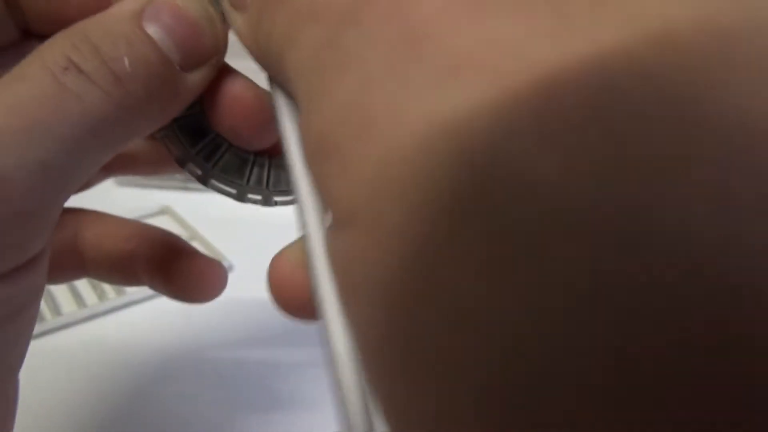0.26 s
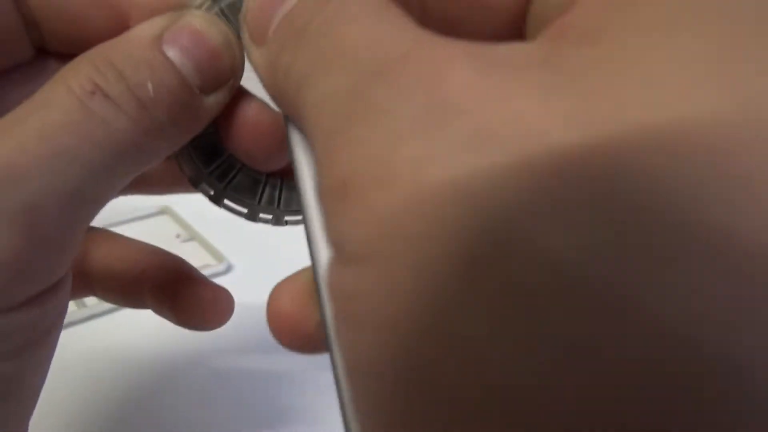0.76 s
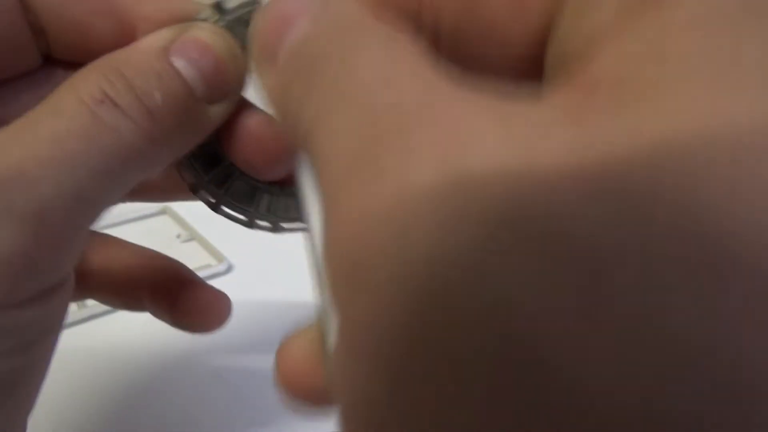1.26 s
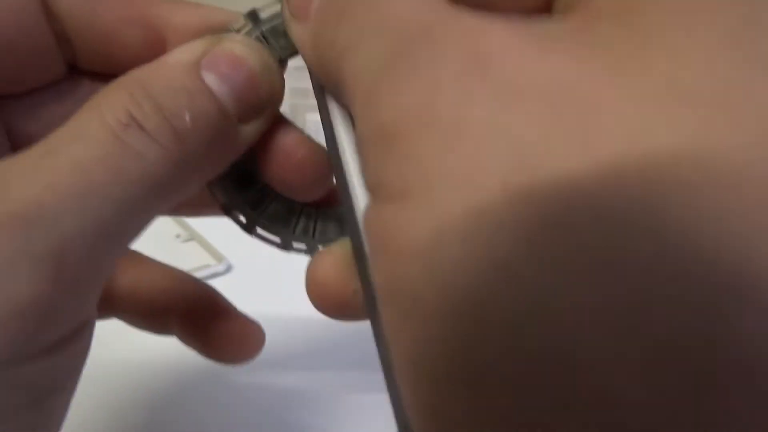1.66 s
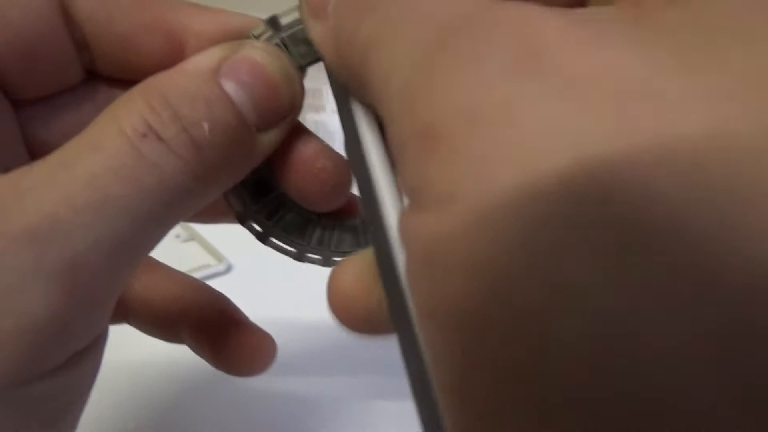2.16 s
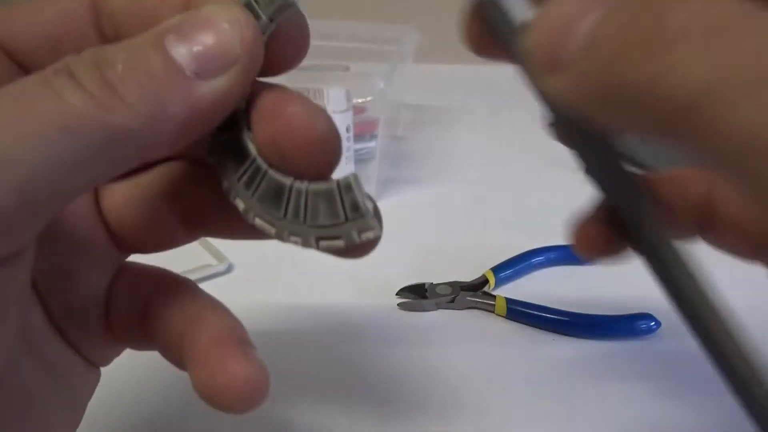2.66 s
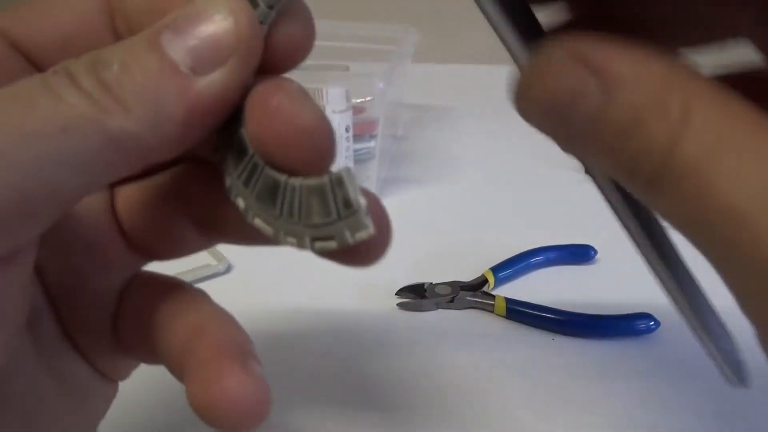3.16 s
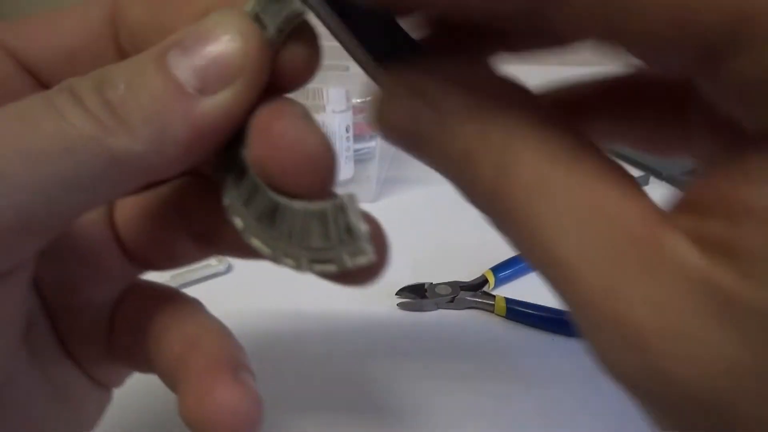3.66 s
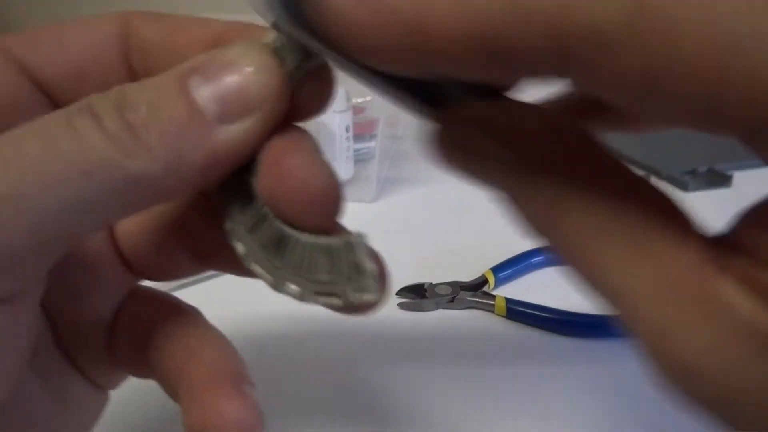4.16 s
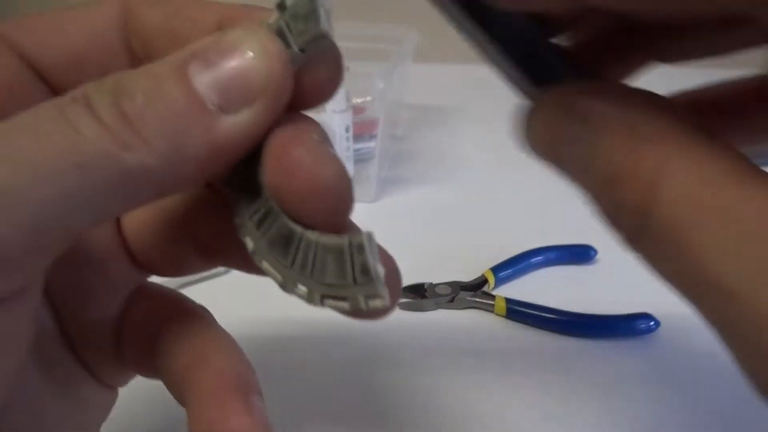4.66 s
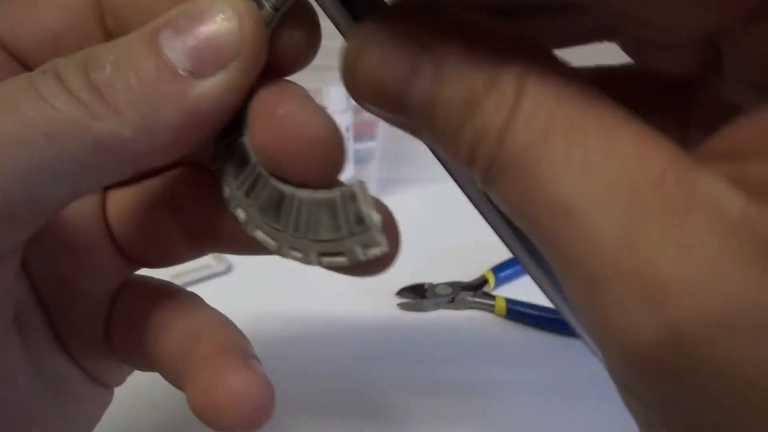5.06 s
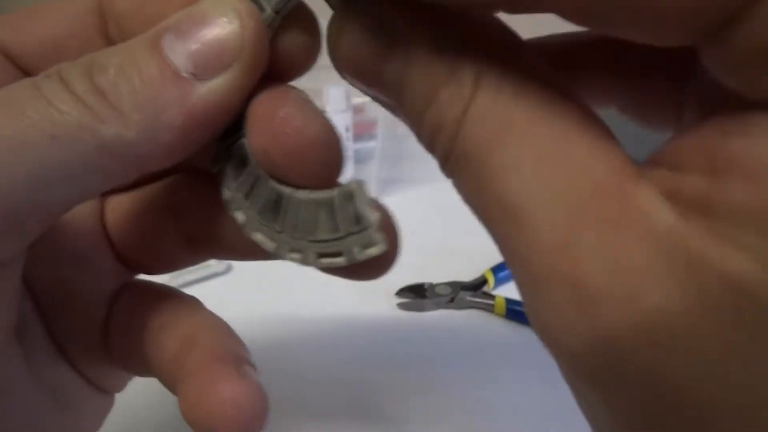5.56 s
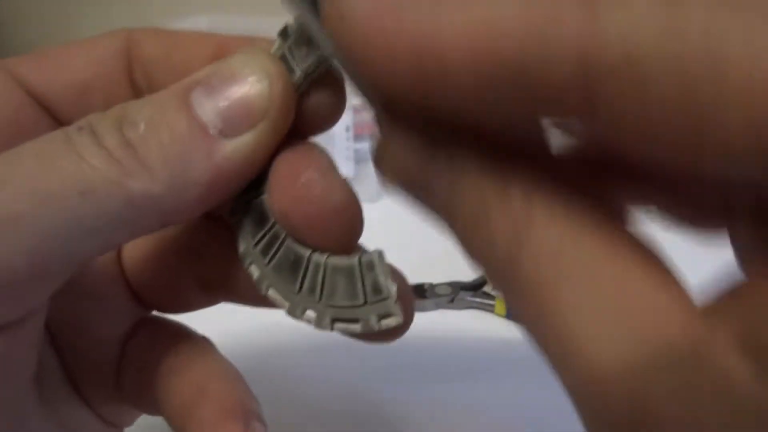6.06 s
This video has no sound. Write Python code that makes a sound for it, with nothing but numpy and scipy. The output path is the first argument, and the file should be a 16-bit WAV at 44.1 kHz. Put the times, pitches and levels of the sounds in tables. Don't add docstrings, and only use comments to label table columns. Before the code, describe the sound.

A sanding stick rasps rhythmically on a small plastic part, then six separate flicks tap and snap, then quick light polishing strokes, close in a quiet room.

```python
import sys
import numpy as np
from scipy import signal
from scipy.fft import rfft, irfft
from scipy.io import wavfile
from scipy.ndimage import uniform_filter1d

SR = 44100
rng = np.random.default_rng(int(sys.argv[2]) if len(sys.argv) > 2 else 0)


def store_wav(level_fs):
    pcm = np.round(np.clip(np.atleast_2d(level_fs), -1, 1) * 32767)
    wavfile.write(sys.argv[1], SR, pcm.T.astype(np.int16))


def gain_from_db(level_db):
    decades = np.asarray(level_db, float) / 20
    return 10 ** decades


N = 277830
GRID_HZ = np.linspace(0, SR / 2, 1025)


def tone_db(points, hz):
    f, db = np.transpose(points)
    return np.interp(np.log(np.maximum(hz, 1)), np.log(f), db)


def ring(db):
    cepstrum = irfft(db * np.log(10) / 20)
    half = len(cepstrum) // 2
    folded = np.concatenate([cepstrum[:1], 2 * cepstrum[1:half], cepstrum[half:half + 1], np.zeros(half - 1)])
    return irfft(np.exp(rfft(folded)))[:half]


def colour(x, points):
    return signal.fftconvolve(x, ring(tone_db(points, GRID_HZ)))[:len(x)]


def unit(x):
    return x / np.sqrt(np.mean(x ** 2))


def walk(rate, size):
    k = int(SR / rate)
    held = np.repeat(rng.standard_normal(size // k + 1), k)
    return 0.8 * uniform_filter1d(held, k)[:size]


def band(hz, width_hz):
    f = np.fft.rfftfreq(N, 1 / SR)
    noise = rfft(rng.standard_normal(N))
    return unit(irfft(noise / (1 + (2 * (f - hz) / width_hz) ** 2), N))


def add(track, s, sound):
    i = int(s * SR)
    track[i:i + len(sound)] += sound[:len(track) - i]


# frequency in Hz, level in dB per Hz.
HUM_AND_HISS = [(18, -41.5), (30, -15), (70, -10.5), (103, -1.5), (131, -17.5), (252, -13), (319, -23),
                (426, -12), (499, -18.5), (1190, -17.5), (2350, -24.5), (12000, -30), (16000, -29)]
# frequency in Hz, side level in dB.
HUM_AND_HISS_WIDTH = [(60, -15.5), (300, -2.5), (700, -8), (1400, -5), (3100, -7.5), (7000, 2),
                      (16000, -10.5)]


def hum_and_hiss():
    f = np.fft.rfftfreq(N, 1 / SR)
    gain = gain_from_db(tone_db(HUM_AND_HISS, f))
    mid, side = (rfft(noise) * gain for noise in rng.standard_normal((2, N)))
    mid = irfft(mid, N)
    side = irfft(side * gain_from_db(tone_db(HUM_AND_HISS_WIDTH, f)), N)
    scale = gain_from_db(-61.5) / np.sqrt(np.mean(mid ** 2))
    return mid * scale, side * scale


# centre in Hz, width in Hz, level in dB.
FAN_BANDS = [
    (1150, 150, -71.5),
    (1470, 160, -69.5),
]


def fan():
    return sum(gain_from_db(db + 2.2 * walk(4.2, N)) * band(hz, width) for hz, width, db in FAN_BANDS)


# time in seconds, level in dB.
OPENING_RUSTLE = [
    (0, -64),
    (.12, -66),
    (.3, -80),
]


def hand_rustle():
    s, db = np.transpose(OPENING_RUSTLE)
    level_db = np.interp(np.arange(N) / SR, s, db, right=-120)
    return gain_from_db(level_db) * (band(2700, 1600) + band(460, 450))


JOLT_DB = [
    -41.5,
    -34,
    -33.5,
]


def bench_rumble():
    rest_db, lag_s, width_s = -77, 0.012, 0.072
    t = np.arange(N) / SR
    shake = np.full(N, gain_from_db(rest_db))
    for table, jolt_db in zip((RUBS, FLICKS, POLISHES), JOLT_DB):
        for _, _, stop, _, top_db in table:
            shake += gain_from_db(top_db + jolt_db) * np.exp(-((t - stop - lag_s) / width_s) ** 2)
    return shake * (band(48, 26) + gain_from_db(-6) * band(104, 60))


# time in seconds, level in dB.
SLEEVES = [(0, -59.5), (.3, -72), (.56, -58), (2.2, -60.5), (2.8, -75), (2.9, -84), (3.35, -70), (3.5, -63),
           (3.85, -61), (4.1, -67), (4.9, -73), (5.5, -69.5), (6.3, -66.5)]


def sleeves():
    s, rub_db = np.transpose(SLEEVES)
    level_db = np.interp(np.arange(N) / SR, s, rub_db) - 4.5
    return gain_from_db(level_db + 2.8 * walk(12, N)) * band(214, 238)


# middle in seconds, length in seconds, level in dB, pitch in Hz.
CREAKS = [
    (3.525, 0.08, -62, 492),
    (3.84, 0.082, -66, 444),
    (4.39, .05, -71, 600),
]


def finger_creaks():
    t = np.arange(N) / SR
    return sum(gain_from_db(db) * np.exp(-((t - s) / length) ** 4) * band(hz, 60) for s, length, db, hz in CREAKS)


def background():
    hush, side = hum_and_hiss()
    air = fan() + hand_rustle()
    hush = hush * gain_from_db(0.85 * walk(0.85, N))
    hands = finger_creaks() + sleeves() + bench_rumble()
    return hush + air + hands, side


# frequency in Hz, gain in dB.
ROOM_TONE = [(150, -8), (500, 1.5), (1300, -5), (2500, 0), (5000, -2.5), (7400, -6.5), (9400, -2),
             (12000, -4), (16000, -7)]
# frequency in Hz, side level in dB.
WIDTH = [(60, -22), (200, -2), (700, -15.5), (1300, -22.5), (3000, -13.5), (5500, -19), (8000, -13),
         (11000, -16.5)]


def room(x):
    t60_s, tail_db, bench_s, bench_db = 0.32, -10.5, 0.0041, -27.5
    t = np.arange(int(0.5 * SR)) / SR
    tails = rng.standard_normal((2, len(t))) * 1000 ** (-t / t60_s) * np.clip(t / 0.0017, 0, 1)
    dull = signal.sosfilt(signal.butter(1, 8000, fs=SR, output="sos"), tails)
    tails = dull + (tails - dull) * 1000 ** (-t / 0.36)
    tails *= gain_from_db(tail_db) / np.sqrt(np.sum(tails[0] ** 2))
    tails[0, int(bench_s * SR)] += gain_from_db(bench_db)
    mid, side = signal.fftconvolve(colour(x, ROOM_TONE)[None], tails, axes=1)[:, :N]
    return mid, colour(side, WIDTH) * gain_from_db(2.0)


def scatter(near):
    echoes = rng.standard_normal(400) * np.hanning(400)
    echoes = signal.sosfilt(signal.butter(1, 600, "high", fs=SR, output="sos"), echoes)
    echoes /= np.sqrt(np.sum(echoes ** 2))
    return colour(signal.fftconvolve(near, echoes)[:N], WIDTH)


BODY_HZ = 2400


def grip(points, body_db):
    shift = 1 + 0.0071 * rng.standard_normal()
    ripple_db = uniform_filter1d(rng.standard_normal(len(GRID_HZ)), size=24) * 5.0
    db = tone_db(points, GRID_HZ * shift) + ripple_db + body_db / (1 + (GRID_HZ / BODY_HZ) ** 6)
    treble = (GRID_HZ > 3000) & (GRID_HZ < 15000)
    return ring(db) / np.sqrt(np.sum(gain_from_db(2 * db[treble])) / len(db))


# time in seconds, thud in dB, tick in dB, ring in Hz.
TAPS = [
    (2.9873, -36, -24, 650),
    (3.3597, -20, -22, 606),
    (3.6546, -20, -22, 527),
    (3.9281, -15, -16.5, 670),
    (4.1812, -14, -19.5, 687),
    (4.4576, -18, -14, 623),
    (4.9728, -27.5, -40, 644),
]
# multiple of the ring frequency, level in dB, time to fall 60 dB in seconds.
TAP_MODES = [
    (2.3, 3, 0.0037),
    (1.0, -1, 0.01),
    (.4, 1.5, 0.0043),
]


def taps():
    out, t = np.zeros(N), np.arange(2000) / SR
    for s, thud_db, tick_db, hz in TAPS:
        modes = sum(gain_from_db(db) * np.sin(2 * np.pi * k * hz * t) * 1000 ** (-t / t60) for k, db, t60 in TAP_MODES)
        rattle = uniform_filter1d(rng.standard_normal(len(t)), size=12) * 1000 ** (-t / 0.035)
        add(out, s + 0.00013, gain_from_db(thud_db - 6.0) * (modes + gain_from_db(-5) * rattle))
        push = np.hanning(int(0.00024 * SR))
        add(out, s - 0.00015, -gain_from_db(thud_db) * push)
        tick = grip(FLICK_TONE, 0)
        add(out, s - 0.0001, -gain_from_db(tick_db - 2.5) * tick / np.max(np.abs(tick)))
    return signal.sosfilt(signal.butter(2, 170, "high", fs=SR, output="sos"), out)


def clicks(events, body_db, crumble_share, decay_s):
    out, t = np.zeros(N), np.arange(240) / SR
    for s, peak_db in events:
        points = RUB_TONE if s < 2.9 else FLICK_TONE if s < 4.8 else POLISH_TONE
        crumble = crumble_share * rng.standard_normal(len(t)) * np.exp(-t / decay_s)
        crumble[0] = rng.choice([-1, 1])
        h = signal.fftconvolve(grip(points, 0.78 * (body_db + 19.0)), crumble)
        add(out, s - 0.0001, gain_from_db(peak_db + 3.0) * h / np.max(np.abs(h)))
    return out


def bites():
    events = [(start + 0.002, top_db + catch_db + 1) for start, _, _, catch_db, top_db in [*RUBS, *POLISHES]]
    return clicks(events, body_db=-7, crumble_share=0.54, decay_s=0.00074)


# time in seconds, peak in dB.
DIGS = [(0.4453, -22.5), (0.598, -22), (0.6052, -29), (0.631, -26), (0.6387, -29), (0.662, -25),
        (0.6724, -29), (0.7001, -25), (0.7209, -29), (0.7674, -34.5), (0.7914, -29), (0.7996, -34),
        (0.9933, -28.5), (1.2539, -19.5), (1.3646, -15), (1.5056, -22), (1.62, -22.5), (2.0066, -21),
        (2.0166, -19), (2.1291, -21), (2.2542, -18.5), (3.0009, -26), (3.6885, -16), (3.961, -21),
        (3.9712, -16), (4.4614, -38), (5.298, -31)]


def digs():
    return clicks(DIGS, body_db=-10.5, crumble_share=0.71, decay_s=0.00087)


# time in seconds, peak in dB.
SKIPS = [(0.1952, -19), (0.3504, -21), (0.5217, -20), (0.585, -29), (0.6181, -35), (0.7262, -27),
         (0.7424, -31), (0.8132, -38), (0.8826, -21), (0.979, -46), (1.2227, -38), (1.4073, -7),
         (1.953, -25), (2.2344, -28), (2.3422, -15), (3.0191, -28), (3.3663, -32), (3.535, -46),
         (4.122, -48), (4.213, -19), (4.5193, -17.5), (4.6336, -40), (4.9457, -41), (4.9495, -45),
         (4.9566, -50), (5.2896, -47), (5.8936, -16)]


def skips():
    return clicks(SKIPS, body_db=-22.5, crumble_share=0.42, decay_s=0.00047)


# time in seconds, peak in dB.
SNAPS = [
    (3.0843, -8),
    (3.4431, 2),
    (3.7388, -1),
    (4.0111, 4.5),
    (4.2504, 0.5),
    (4.5142, 3),
]


def snaps():
    return clicks(SNAPS, body_db=-23.5, crumble_share=0.086, decay_s=0.00024)


def grit(size, coarse_db, chatter_db):
    hardness = np.minimum(rng.exponential(size=size), 4.3)
    grains = rng.standard_normal(size) * gain_from_db(coarse_db * hardness)
    chatter = walk(300, size) + 0.53 * walk(44.7, size)
    return unit(grains * gain_from_db(chatter_db * chatter))


# strongest moment in seconds,
# level in dB, rise and fall in seconds.
GRAZES = [(0.212, -58.5, .003, 0.032), (0.264, -60, .06, .012), (0.425, -51, 0.033, .02),
          (0.602, -53, 0.0264, .016), (0.663, -35.5, 0.036, 0.022), (0.65, -42, 0.035, 0.042),
          (0.697, -39.5, 0.022, 0.024), (0.72, -42, 0.025, 0.013), (0.741, -57, .003, 0.0068),
          (0.792, -50.5, 0.0086, 0.024), (0.78, -55, 0.023, .01), (2.498, -69, .05, .02),
          (2.656, -61, .3, 0.12), (3.968, -27.5, 0.0064, .001), (4.218, -23, 0.0035, .001),
          (4.43, -56, .02, .01), (4.95, -67, .05, .01), (5.0, -53.5, 0.032, 0.045)]


def grazing():
    t, force = np.arange(N) / SR, np.zeros(N)
    for s, db, rise_s, fall_s in GRAZES:
        away = np.where(t < s, (s - t) / rise_s, (t - s) / fall_s)
        force += gain_from_db(db - 15 * away)
    skim = signal.fftconvolve(force * grit(N, 2.5, 3.9), grip(RUB_TONE, 3.4))[:N]
    return skim + gain_from_db(-13.5) * force * band(220, 240)


def strokes(table, points, usual_top_db, usual_body_db, bite_s, hold, linger_s, coarse_db, chatter_db):
    out = np.zeros(N)
    for start, top, stop, catch_db, top_db in table:
        t = start + np.arange(int((stop - start + linger_s) * SR)) / SR
        brake = top + hold * (stop - top)
        rise = np.sin(np.pi / 2 * np.clip((t - start) / (top - start), 0, 1))
        slow = np.cos(np.pi / 2 * np.clip((t - brake) / (stop + linger_s - brake), 0, 1)) ** 1.4
        bite = np.clip((t - start) / bite_s, 0, 1)
        rubbing = gain_from_db(top_db) * slow * bite * grit(len(t), coarse_db, chatter_db)
        body_gain_db = min(0.95 * (usual_top_db - top_db), 4.5)
        whole = grip(points, usual_body_db + body_gain_db)
        body = signal.sosfilt(signal.butter(2, BODY_HZ, fs=SR, output="sos"), whole)
        pressure = gain_from_db(0.28 * catch_db * (1.5 - rise) - 2.0)
        speed = gain_from_db(1.45 * catch_db * (1 - rise))
        add(out, start, signal.fftconvolve(rubbing * pressure, body))
        add(out, start, signal.fftconvolve(rubbing * speed, whole - body))
    return out


# catch, fastest moment and stop in seconds, catch in dB under the top, top in dB.
POLISHES = [(5.02, 5.064, 5.075, -8, -43.5), (5.146, 5.166, 5.214, -4, -33),
            (5.295, 5.318, 5.366, -3, -30.5), (5.401, 5.435, 5.493, -5, -33.5),
            (5.516, 5.548, 5.603, -6, -32.5), (5.641, 5.688, 5.733, -10, -30), (5.764, 5.8, 5.846, -4, -32),
            (5.881, 5.92, 5.971, -4, -36), (6.002, 6.036, 6.08, -5, -33.5),
            (6.117, 6.155, 6.207, -2.5, -36), (6.228, 6.275, 6.32, -8, -33)]
# frequency in Hz, level in dB per Hz.
POLISH_TONE = [(88, -53), (150, -20.5), (264, -24.5), (422, -17.5), (854, -13), (1120, -7.5), (2060, -14),
               (2450, -10), (5450, -9.5), (5950, -7.5), (7400, 0), (9000, -9), (11000, -3), (14800, -9.5),
               (16000, -23)]


def polishing():
    return strokes(POLISHES, POLISH_TONE, usual_top_db=-29.5, usual_body_db=-0.1, bite_s=0.0033,
                   hold=0.29, linger_s=0.0096, coarse_db=2.0, chatter_db=2.5)


# catch, fastest moment and stop in seconds, catch in dB under the top, top in dB.
FLICKS = [
    (3.0, 3.04, 3.085, -16, -25.5),
    (3.388, 3.44, 3.444, -14, -23),
    (3.685, 3.736, 3.74, -4.5, -24),
    (3.966, 4.0, 4.012, -3, -23),
    (4.216, 4.245, 4.252, -4, -22),
    (4.476, 4.51, 4.516, -5, -22),
]
# frequency in Hz, level in dB per Hz.
FLICK_TONE = [(88, -59), (150, -23), (231, -18), (871, -16.5), (1140, -8.5), (2360, -13), (3040, -14.5),
              (3840, -8.5), (4950, -9), (7470, 0), (9440, -6.5), (12200, -2), (16000, -17)]


def flicking():
    return strokes(FLICKS, FLICK_TONE, usual_top_db=-21.5, usual_body_db=1.3, bite_s=0.0011,
                   hold=0.94, linger_s=0.0018, coarse_db=3.0, chatter_db=-0.7)


# catch, fastest moment and stop in seconds, catch in dB under the top, top in dB.
RUBS = [(0.142, 0.189, 0.22, -23, -36), (0.325, 0.368, 0.411, -9.5, -34), (0.441, 0.503, 0.549, -5, -29),
        (0.858, 0.906, 0.942, -15.5, -29.5), (1.0, 1.058, 1.086, -4, -30.5),
        (1.12, 1.164, 1.204, -8.5, -27), (1.236, 1.292, 1.336, -5, -29), (1.363, 1.422, 1.458, -4, -27.5),
        (1.488, 1.551, 1.592, -7.5, -30), (1.613, 1.661, 1.7, -5, -26), (1.739, 1.805, 1.843, -5, -29.5),
        (1.871, 1.916, 1.958, -7, -26.5), (1.995, 2.046, 2.094, -7.5, -30.5),
        (2.122, 2.176, 2.205, -6, -26.5), (2.249, 2.301, 2.354, -5, -25.5)]
# frequency in Hz, level in dB per Hz.
RUB_TONE = [(88, -47), (150, -13), (231, -12), (368, -21), (566, -10.5), (941, -17.5), (1100, -10),
            (1720, -3.5), (2310, -11), (3770, -7.5), (4950, -3), (5910, -4.5), (11300, -2), (15100, -8),
            (16000, -13)]


def rubs():
    return strokes(RUBS, RUB_TONE, usual_top_db=-26.5, usual_body_db=0.5, bite_s=0.0026,
                   hold=0.046, linger_s=0.0078, coarse_db=2.0, chatter_db=1.3)


def scene():
    near = rubs() + flicking() + polishing() + grazing()
    near += bites() + digs() + skips() + snaps() + taps()
    scattered = scatter(near)
    room_mid, room_side = room(near)
    quiet_mid, quiet_side = background()
    mid = near + room_mid + quiet_mid
    side = scattered + room_side + quiet_side
    left_db = 0.9
    return np.array([(mid + side) * gain_from_db(left_db / 2), (mid - side) * gain_from_db(-left_db / 2)])


# from this frequency in Hz, share of the time.
SIDE_KEPT = [(0, 1), (1200, .6), (1900, .35), (2600, .2), (3400, .15), (4100, .3), (4800, .7), (5600, .9),
             (6900, .85), (8200, .8), (9600, .9), (11300, .05), (12500, .04)]


def thin_side(x):
    mid, side = (x[0] + x[1]) / 2, (x[0] - x[1]) / 2
    f, _, frames = signal.stft(side, SR, nperseg=2048)
    edges, share = np.transpose(SIDE_KEPT)
    kept = rng.random((len(edges), frames.shape[1] // 2 + 1)) < share[:, None]
    kept = np.repeat(kept, 2, axis=1)[:, :frames.shape[1]]
    band_of = np.searchsorted(edges, f, side="right") - 1
    side = signal.istft(frames * kept[band_of], SR, nperseg=2048)[1][:N]
    return np.array([mid + side, mid - side])


def band_limit(x):
    return signal.sosfilt(signal.butter(12, 17000, fs=SR, output="sos"), x)


def record(dry):
    rounded = 0.8 * np.tanh(dry / 0.8)
    top_cut = signal.ellip(9, 0.5, 60, 15750, fs=SR, output="sos")
    mix = thin_side(signal.sosfilt(top_cut, rounded))
    return band_limit(mix)


dry = scene()
out = record(dry)
store_wav(out)
```